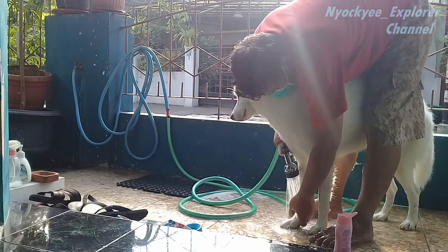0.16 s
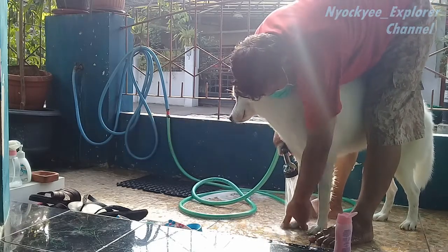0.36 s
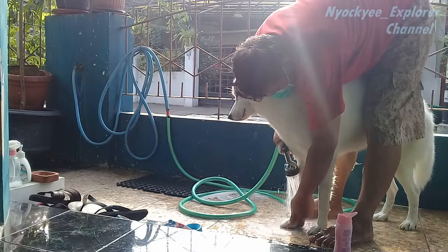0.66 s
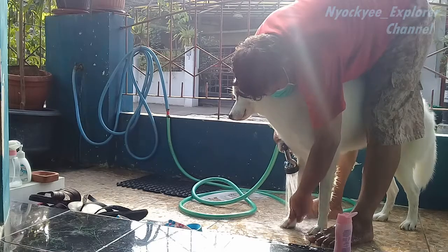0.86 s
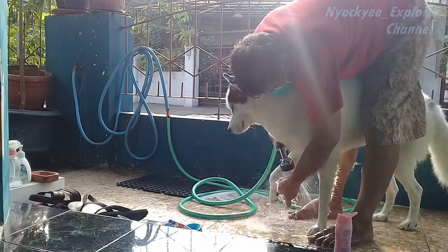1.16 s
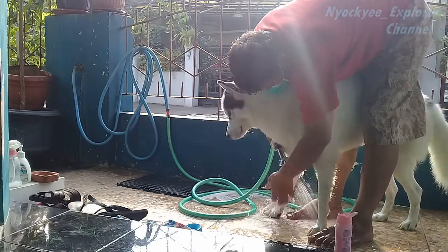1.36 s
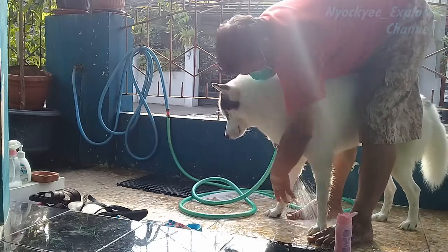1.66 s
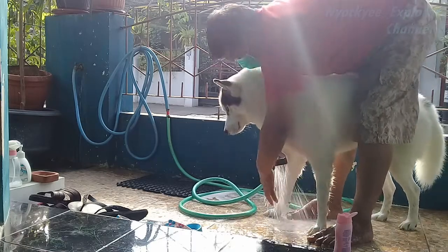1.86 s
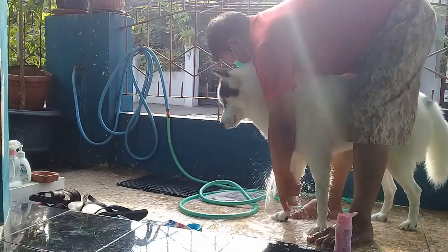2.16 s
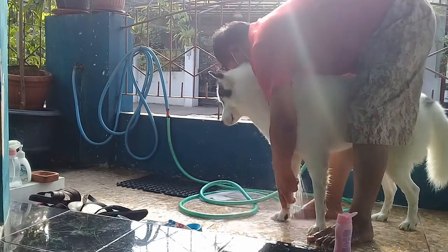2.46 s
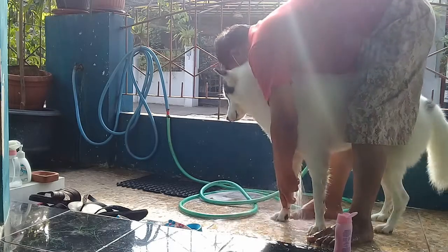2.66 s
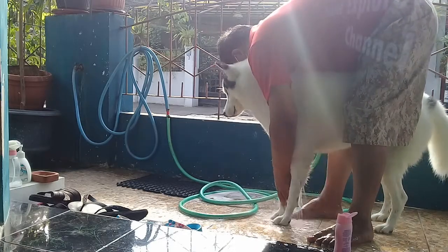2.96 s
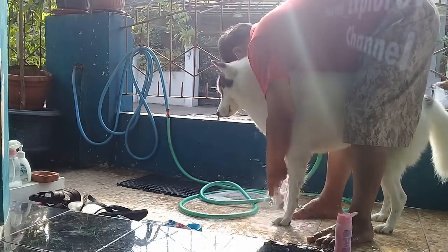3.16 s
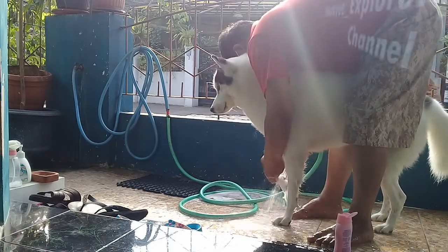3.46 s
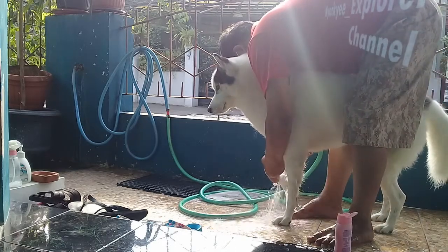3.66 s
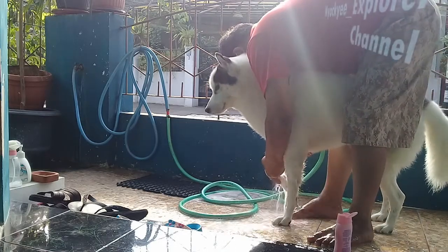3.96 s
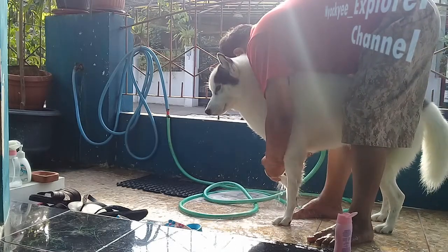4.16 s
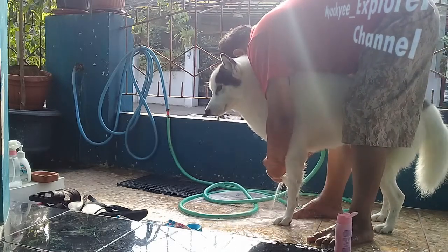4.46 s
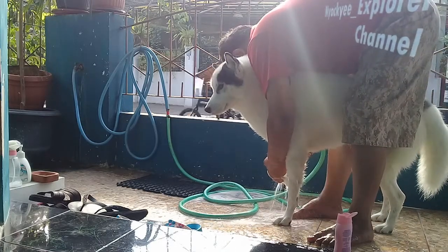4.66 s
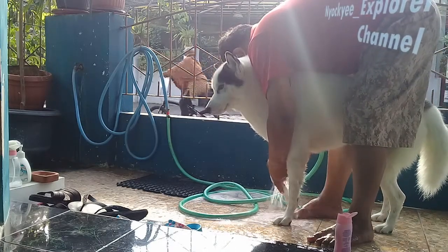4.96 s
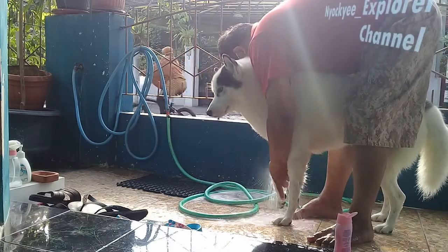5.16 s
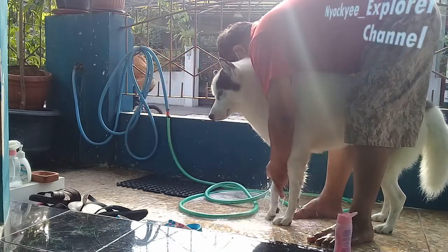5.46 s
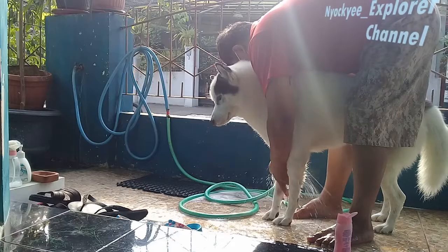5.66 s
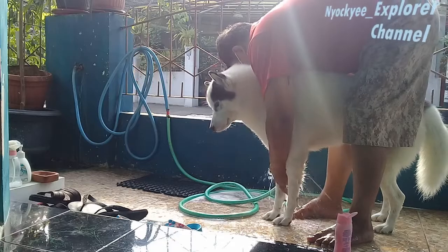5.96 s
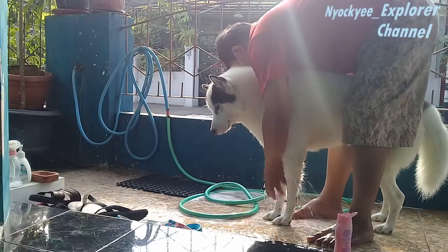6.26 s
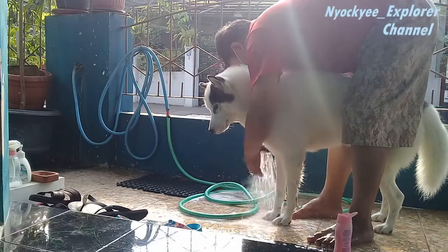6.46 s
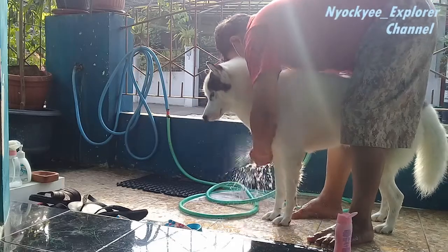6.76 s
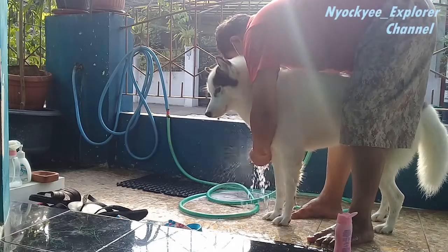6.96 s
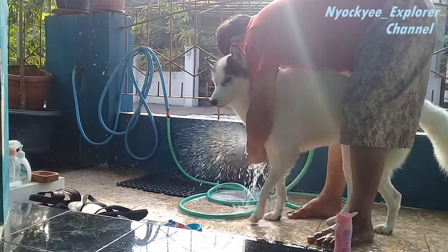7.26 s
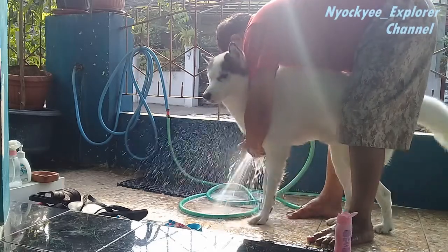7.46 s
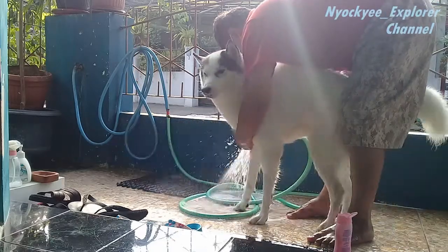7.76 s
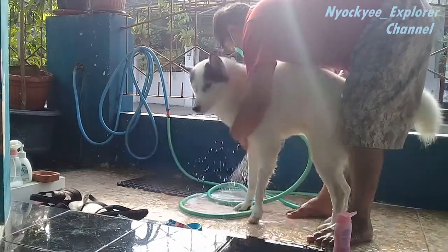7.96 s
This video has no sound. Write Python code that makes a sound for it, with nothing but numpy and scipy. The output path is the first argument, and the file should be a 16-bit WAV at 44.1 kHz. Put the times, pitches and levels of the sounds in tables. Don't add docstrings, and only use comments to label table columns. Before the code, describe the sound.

A hose nozzle sprays a dog's legs close to the microphone on a half-open tiled terrace. Continuous bright hiss and fine patter surge and ease as a hand and legs cross the stream, with bubbling puddle gurgles, short gushes off fur and scattered fat drops. Near the end the spray thins and flung drops snap sharply on the tiles. A faint motor hum and traffic rumble sit far behind.

```python
import sys
import numpy as np
from scipy import signal
from scipy.fft import rfft, irfft
from scipy.io import wavfile

SR = 44100
rng = np.random.default_rng(int(sys.argv[2]) if len(sys.argv) > 2 else 0)


def ratio_of_db(decibels):
    return 10 ** (np.asarray(decibels, float) / 20)


def transcribe(u):
    v = np.clip(np.atleast_2d(u).T, -1, 1)
    q = np.round(v * 32767).astype(np.int16)
    wavfile.write(sys.argv[1], SR, q)


N = 357651

# pitch_hz, density_db (dB per Hz)
STREET_SPECTRUM = [(18, -45), (28, -25), (40, -8.5), (49, -19), (65, -2.5), (93, 1), (130, -1.5), (200, -6),
                   (250, -16.5), (300, -5.5), (360, -13), (450, -13.5), (600, -22.5), (1500, -52)]
# time_s, level_db
STREET_LEVEL = [
    (0.0, -56.5),
    (0.27, -53),
    (3.9, -54),
    (4.3, -52.5),
    (4.7, -55),
    (5.7, -54.5),
    (6.3, -55),
    (8.11, -54.5),
]
# start_s, length_s, pitch_hz, level_db (rms)
ENGINE_DRONES = [(.1, 0.93, 99, -55.5), (.38, 0.19, 338, -61), (.94, 0.16, 272, -57.5),
                 (1.85, 0.45, 101.5, -61), (2.148, 0.13, 295, -60.5), (2.4, 0.75, 101, -55.5),
                 (3.128, .15, 274, -63.5), (3.458, 0.21, 337.5, -56.5), (3.95, 0.32, 101.2, -55.5),
                 (4.45, 0.19, 101.5, -53), (5.2, .35, 97.5, -58.5), (6.3, 0.63, 104, -58),
                 (7.093, 0.83, 110, -54.5)]
# pitch_hz, level_db (rms), wobble_db
PUMP_TONES = [
    (386.6, -54.6, 0.6),
]
# pitch_hz, density_db (dB per Hz)
JET_SPECTRUM = [(2500, -5.5), (5000, -4), (6800, -4), (8000, -0.5), (9200, -5), (9800, 1), (12000, -1.5),
                (14000, -2), (15500, -4.5), (17500, -44)]
# pitch_hz, level_db
CRACKLE_SPECTRUM = [(3500, -14), (6000, -27), (10000, 3), (14500, -11)]
# pitch_hz, level_db
PATTER_SPECTRUM = [(1700, -26), (2400, -4), (3200, 0.5), (4500, 1), (6000, 7.5), (8000, -6.5)]
# pitch_hz, level_db
SPLASH_SPECTRUM = [(1080, 8.5), (1400, 11.5), (1800, 3), (2200, 14), (2800, 17.5)]
# pitch_hz, level_db
GURGLE_SPECTRUM = [(600, -7.5), (750, -12.5), (900, -17), (1050, 2.5)]

# time_s, force_db, bare_tile_share_db, puddle_share_db, puddle_bubble_hz
STREAM_PATH = [(0.0, -50, -0.5, -2.5, 1280), (0.2, -52, -1.5, 0, 1464), (0.6, -52.5, 2.5, -0.5, 1410),
               (0.78, -51.5, -1.5, -11.5, 1630), (1.2, -49.5, -6, -8, 1850), (1.63, -53, 0, -5.5, 1910),
               (1.7, -44.5, -7.5, -18, 1850), (2.08, -49.5, -5, -8, 1850), (2.44, -47.5, -5, -8, 1550),
               (2.62, -49.5, 0, -3, 2030), (3.27, -50.5, -1.5, -10.5, 1870), (3.36, -45.5, -4, -1, 1910),
               (4.0, -46, -0.5, -1, 1780), (4.15, -48, 1.5, -2.5, 2080), (5.2, -45.5, -1.5, -6, 1770),
               (5.38, -55.5, -4, 2, 1610), (6.38, -48.5, 1, -7, 2000), (6.56, -48, 0, -7, 2170)]
# peak_s, length_s, hiss_change_db, patter_change_db
LIMB_SWEEPS = [(0.29, 0.19, 3.5, 5), (0.46, 0.4, -2.5, -5.5), (1.02, 0.08, 1.5, 6.5), (1.22, 0.095, 2.5, 4),
               (1.3, 0.21, 1.7, 5), (1.44, 0.076, 2.5, 3), (1.53, 0.15, 0, 1.5), (1.72, 0.07, -1.5, 3.5),
               (1.92, 0.23, 5.5, 0.5), (2.21, 0.1, -7.5, 1.5), (2.27, 0.27, 3.5, -0.5),
               (2.64, 0.16, 0.5, 1), (3.09, 0.16, 2.5, 3), (4.54, 0.06, -2, -1), (3.42, 0.15, -0.5, 4.5),
               (5.09, 0.2, -1, 2.5), (5.42, 0.084, 5, -5), (5.94, 0.1, 0.5, 3), (6.01, 0.087, -2.5, 3),
               (6.3, 0.11, 1, 1), (6.38, 0.16, -5, -7), (6.44, 0.63, 2, 1.5), (6.76, 0.38, -6, -15),
               (7.11, 0.23, 3, 2.5), (7.28, 0.51, -6, -7.5), (7.39, 0.065, -2, 14), (7.55, 0.3, 4, -4.5),
               (7.79, 0.15, 4.5, 4), (8.085, 0.14, -11, -12), (2.92, 0.086, 1.5, 1), (6.9, 0.24, -3, -1),
               (7.16, 0.06, -4, 0), (7.47, 0.14, -3.5, 0), (1.48, 0.05, 1, 2), (6.62, 0.14, -0.5, 1)]
# peak_s, length_s, splash_change_db, gurgle_change_db
PUDDLE_PLUNGES = [(0.3, 0.39, 9, 3), (0.38, 0.15, 2.5, 2), (1.02, 0.17, 7, 15), (0.8, 0.68, 7, 18),
                  (1.24, 0.19, -4, -8), (1.33, 0.066, 5, 8), (1.74, 0.073, 6, 21), (1.96, 0.12, 0, 12),
                  (2.24, 0.096, 1, 8), (3.09, 0.076, 4, 12), (3.18, 0.27, 9, 7), (3.5, 0.43, 0, 5),
                  (4.13, 0.39, -4.5, 0), (4.34, 0.12, -0.5, 1), (4.54, 0.059, 3, -5), (4.99, 0.29, 1.5, 6),
                  (5.1, 0.13, -6, -11), (5.35, 0.1, 1, 6), (5.8, 0.94, 1, 10), (6.05, 0.19, -3, -7),
                  (6.19, 0.13, 0, 1), (6.35, 0.055, 2, 8), (6.8, 0.33, -2.5, 0), (7.12, 0.27, 8, 3),
                  (7.405, 0.13, 8, 0), (7.54, 0.3, 6, 6), (7.79, 0.13, -17, 2), (7.87, 0.16, 7, 11),
                  (8.0, 0.2, -12, 8), (8.09, 0.089, -18.5, -1), (4.82, 0.18, 1, -7), (5.85, 0.11, -4, -4),
                  (6.62, 0.23, 1, 4), (7.27, 0.2, 0, -3)]
# start_s, end_s, softened_below_hz, loss_db
PUDDLE_MISSES = [
    (1.17, 2.333, 1230, -2),
    (6.42, 7.372, 1390, -5.5),
    (7.45, 8.11, 1240, -5),
]

# start_s, length_s, pitch_hz, level_db (rms)
FUR_GUSHES = [(.27, 0.13, 1490, -52), (1.22, .06, 2460, -59), (1.265, .04, 4000, -54),
              (1.39, 0.027, 3500, -54), (1.43, .03, 3400, -53), (1.465, .04, 2300, -56.5),
              (1.545, .05, 2620, -60), (1.63, .04, 4200, -55), (1.71, 0.037, 4300, -59),
              (1.77, .02, 5400, -57), (1.79, 0.027, 3200, -57), (1.85, .04, 5400, -53),
              (2.03, .02, 5700, -54), (2.112, 0.057, 2400, -55), (2.23, 0.064, 2980, -53),
              (2.37, 0.046, 5700, -52), (2.62, .08, 2140, -58), (2.79, 0.048, 1350, -59),
              (3.15, .06, 2550, -56), (3.36, .03, 4830, -51), (3.4, 0.12, 2850, -52),
              (3.52, 0.096, 1640, -51.5), (3.59, 0.081, 2060, -51), (3.57, .09, 4200, -58),
              (3.91, .08, 1270, -60), (4.96, 0.055, 1700, -52), (5.03, .06, 4630, -54),
              (5.1, 0.065, 4600, -59), (5.08, 0.064, 2800, -51), (5.18, .04, 3500, -51),
              (5.68, 0.11, 1620, -58), (6.322, 0.041, 2040, -47), (6.44, .06, 3400, -56),
              (6.59, .05, 5200, -59), (7.09, .02, 2900, -60), (7.09, 0.061, 1690, -55),
              (7.12, .045, 3400, -48), (7.39, .02, 2200, -60), (7.6, .025, 2700, -53),
              (7.43, .03, 3800, -57), (7.76, 0.13, 3600, -51), (7.81, 0.068, 2270, -58),
              (7.83, 0.037, 4200, -54), (1.32, .01, 12000, -52), (1.426, .012, 12000, -48),
              (1.426, .012, 9500, -54), (2.9, .05, 4400, -55), (.3, 0.092, 2200, -61), (3.3, .1, 2600, -56)]
# start_s, length_s, pitch_hz, level_db (rms)
DROP_SHOWERS = [(.6, 0.57, 840, -65), (3.55, 0.44, 550, -64.5), (3.95, 0.33, 610, -64.5),
                (3.38, 0.21, 1950, -49.5), (1.45, 0.26, 3200, -68), (1.5, 0.89, 1320, -70),
                (2.1, 0.42, 2550, -60), (2.8, 0.37, 1200, -71), (3.3, 0.72, 4270, -54),
                (3.9, .55, 4100, -59), (4.55, 0.44, 2780, -52), (4.85, 0.52, 4800, -55),
                (4.85, 0.18, 1600, -56), (6.5, 0.44, 4800, -62), (5.75, .5, 5600, -57),
                (4.0, .4, 11500, -54), (5.5, .3, 980, -68)]
# start_s, length_s, pitch_hz, level_db (rms)
FUR_TRICKLES = [
    (6.76, 0.19, 1650, -68),
    (5.95, .3, 2200, -63),
    (5.4, .15, 1550, -63),
    (4.95, 0.055, 1680, -56),
]
# time_s, peak_db, ring_hz, crack_db
FAT_DROPS = [(0.5997, -31, 1300, -9), (1.3104, -33, 1620, -6), (1.4274, -28, 3400, 0),
             (1.7883, -25, 3160, 4), (1.84, -27, 4800, 5), (2.42, -33.5, 1320, -6),
             (2.596, -19.5, 3700, -10), (3.1417, -25, 2660, 1), (3.162, -31, 2580, -6),
             (3.2615, -29, 2610, -1), (3.709, -20.5, 3600, -2), (5.0076, -32, 3500, 3),
             (5.1711, -22.5, 3540, -4), (5.2693, -24.5, 3600, -2), (5.5893, -32, 2440, -6),
             (5.9289, -26, 2560, -2), (6.0701, -27, 4300, 8), (6.1594, -26, 3670, 9),
             (6.319, -29, 2120, -9),
             (6.4118, -31, 3440, -1), (6.587, -26, 5500, 1.5), (6.794, -26.5, 4230, 0),
               (6.8259, -23.5, 3790, -8), (7.026, -30, 3340, 8), (7.078, -21, 3050, 0),
               (7.111, -21, 3400, -2), (7.194, -28, 6940, 11), (7.294, -35, 2370, -1),
               (7.3178, -26, 3770, 3), (7.3547, -40, 4200, 12), (7.3785, -28, 2830, 3),
               (7.5383, -26, 3970, 7), (7.591, -23.5, 2750, -4), (7.6322, -23, 4100, 3),
               (7.649, -29, 4090, 6.5), (7.665, -26, 5780, 1.5), (7.745, -26, 3780, 0.2),
               (7.889, -24, 3600, 1), (8.098, -22.5, 2870, 1)]
# time_s, peak_db, ring_hz, crack_db
BEAD_TICKS = [(1.3224, -45, 5100, -1.5), (1.3794, -34, 5180, -1.5), (1.5494, -41, 2560, -5),
              (1.6771, -37, 8980, -3), (2.04, -46, 4120, -1.5), (2.24, -44, 2640, -10),
              (2.9187, -39, 4340, -7), (5.4174, -45, 8330, -6), (5.4594, -42, 5330, -6),
              (5.5394, -41, 5950, -7), (7.0724, -34, 3080, 1), (7.2294, -41, 4500, 0),
              (7.568, -38, 4500, 0), (7.6694, -35, 7800, 9), (7.9894, -34, 9960, -1.5),
              (8.0094, -35, 10700, 7), (8.096, -30.5, 3980, 4)]
# time_s, peak_db, ring_hz, crack_db
TINY_PRICKS = [(1.3231, -30, 5030, 0), (1.3674, -29, 5190, 0), (1.4278, -34, 13400, 0),
               (1.6772, -32, 9450, 2), (1.771, -35, 5230, 0), (1.8139, -32, 9730, -3),
               (2.2395, -37, 8450, 0), (3.0636, -25, 10100, 0), (5.4182, -34, 11100, -3),
               (5.5405, -42, 6000, 2), (5.8298, -43, 5140, 0), (5.9096, -35, 5600, 0),
               (6.414, -34, 5200, 0), (6.9787, -47, 5000, -2), (7.0765, -35, 6180, 0),
               (7.1159, -29, 5470, 0), (7.1927, -25.5, 6940, 0), (7.3109, -39, 5160, 0),
               (7.3588, -36, 5050, 0), (7.3803, -32, 5280, -4), (7.6681, -28, 5780, 0),
               (7.9889, -30, 9960, 0), (8.0094, -26, 10700, 0)]
# time_s, peak_db, ring_hz, crack_db
DRY_SNAPS = [(0.303, -42, 2600, -9), (0.39, -42, 2200, -9), (1.308, -40, 2250, -6), (5.009, -33, 3600, -3),
             (5.173, -34, 2900, -3), (5.175, -36, 4500, -3), (5.272, -41, 3100, -6), (6.796, -40, 5000, -3),
             (7.032, -38, 4400, -3), (7.0783, -25, 3200, 0), (7.083, -31, 3300, 0), (7.095, -34, 3000, -3),
             (7.1115, -25, 3200, -1), (7.116, -30, 3320, -3), (7.133, -37, 3500, 0), (7.191, -39, 1800, -6),
             (7.227, -37, 4600, 2), (7.294, -41, 2700, 6), (7.3548, -33.5, 4200, 7), (7.377, -40, 1700, 3),
             (7.380, -28, 3000, 0), (7.394, -33, 3300, -3), (7.399, -35, 2600, -1), (7.43, -37, 4300, 2),
             (7.538, -35, 3500, 3), (7.845, -39, 1900, 0), (8.097, -34, 5000, 0), (8.103, -38, 2300, 0)]
# time_s, peak_db, centre_hz, crack_db
WATER_SHEETS = [
    (5.9287, -23.5, 3600, 5),
    (6.4123, -20, 4200, -14),
    (7.3786, -17, 3600, -11),
]

# pitch_hz, width_hz, lift_db
ECHO_RIDGES = [(820, 80, 3), (1030, 90, -4), (1123, 50, 3.5), (1290, 70, 3), (1550, 120, 4), (1800, 150, 3),
               (2400, 250, 4), (3020, 200, 2.5), (3400, 200, 2.5), (4300, 350, 3)]
# time_s, bands (count)
TREBLE_GRAIN = [(0.015, 1), (0.108, 1), (0.781, 2), (0.804, 2), (2.128, 2), (2.848, 1), (3.126, 3),
                (3.498, 3), (3.684, 2), (3.8, 1), (3.939, 1), (4.264, 1), (4.287, 1), (4.311, 1),
                (4.543, 2), (4.612, 1), (4.821, 1), (5.402, 2), (6.052, 1), (6.215, 3), (6.702, 2),
                (7.167, 1), (7.492, 1)]
# start_s, end_s
DROPOUT = (6.9574, 6.9786)

PUDDLE_MEAN_DB = -52


def rms_one(x):
    return x / np.sqrt(np.mean(x ** 2) + 1e-20)


def at_hz(points, hz):
    pitch_hz, level_db = np.array(points)[:, 0], np.array(points)[:, 1]
    return np.interp(np.log(hz), np.log(pitch_hz), level_db)


def drift(rate, at=None):
    r = np.exp(-80 * np.pi * rate / SR)
    sparse = rng.standard_normal(N // 40 + 2002)
    slow = signal.lfilter([1], [1, -2 * r, r * r], sparse)[2000:]
    samples = np.arange(N) if at is None else at
    return np.interp(samples / 40, np.arange(len(slow)), rms_one(slow))


def ring(clicks, hz, t60):
    r, w = ratio_of_db(-60 / (t60 * SR)), 2 * np.pi * hz / SR
    return signal.lfilter([0, np.sin(w)], [1, -2 * r * np.cos(w), r * r], clicks + 1e-18)


def band(x, low, high):
    sos = signal.butter(2, [low, min(high, .45 * SR)], "band", fs=SR, output="sos")
    return signal.sosfilt(sos, x)


def in_time(rows):
    s, *columns = np.transpose(rows)
    return [np.interp(np.arange(N) / SR, s, c) for c in columns]


def crossings(events):
    out, t = np.zeros((2, N)), np.arange(N) / SR
    quick_share = 0.3
    for s, length, *change_db in events:
        before = quick_share if sum(change_db) > 0 else 1 - quick_share
        start, end = s - before * length, s + (1 - before) * length
        span = slice(max(round(start * SR), 0), round(end * SR))
        hump = np.interp(t[span], [start, s, end], [0, 1, 0])
        out[:, span] += np.outer(change_db, hump)
    return out


def banded_noise(spectrum, patchy_db, flicker_rate, count):
    out, together, white = 0, drift(flicker_rate), rng.standard_normal((2, N))
    edges = 20 * 2 ** np.arange(0, 10, 1 / count)
    for k, (low, high) in enumerate(zip(edges, edges[1:])):
        hz = np.sqrt(low * high)
        if spectrum[0][0] <= hz <= spectrum[-1][0]:
            flicker_db = patchy_db * (0.57 * together + drift(flicker_rate))
            level = ratio_of_db(at_hz(spectrum, hz) + flicker_db) * np.sqrt(hz)
            out = out + level * rms_one(band(white[k % 2], low, high))
    return rms_one(out)


def street():
    return ratio_of_db(in_time(STREET_LEVEL)[0]) * banded_noise(STREET_SPECTRUM, patchy_db=0.5, flicker_rate=1.9, count=3)


def pump():
    t, out = np.arange(N) / SR, np.zeros(N)
    for hz, db, wobble_db in PUMP_TONES:
        level = np.sqrt(2) * ratio_of_db(db + wobble_db * drift(2.5))
        out += level * np.sin(2 * np.pi * hz * t + 0.16 * drift(1.1))
    return out


def drops(spectrum, per_s, cycles, uneven_db, clump_db, patch_db, centre_hz=None, focus_db=0, count=20):
    size_db = uneven_db * np.minimum(rng.exponential(1, N), 3)
    signs = rng.choice([-1, 1], N)
    landed, clumps_db = rng.random(N) < per_s / SR, clump_db * drift(38)
    pitches = np.geomspace(spectrum[0][0], spectrum[-1][0], count)
    dealt = rng.integers(0, count, N)
    out = 0
    for k, hz in enumerate(pitches):
        at, clicks = np.flatnonzero(landed & (dealt == k)), np.zeros(N)
        flurry_db = patch_db * drift(5.0, at)
        level_db = at_hz(spectrum, hz) + clumps_db[at] + flurry_db
        if centre_hz is not None:
            level_db -= focus_db * np.log2(hz / centre_hz[at]) ** 2
        clicks[at] = signs[at] * ratio_of_db(level_db + size_db[at])
        out = out + np.sqrt(hz) * ring(clicks, hz, np.clip(cycles, 1, 14) / hz)
    no_lows = signal.butter(6, .9 * pitches[0], "high", fs=SR, output="sos")
    return rms_one(signal.sosfilt(no_lows, out))


def jet(jet_db):
    beads = drops(CRACKLE_SPECTRUM, 980, 4.1, uneven_db=7.0, clump_db=4.0, patch_db=-2.0, count=10)
    hiss = banded_noise(JET_SPECTRUM, patchy_db=1.0, flicker_rate=15, count=6)
    return ratio_of_db(jet_db) * (hiss + ratio_of_db(-16.0) * beads)


def tile_patter(force_db, tile_db, jet_db):
    finer_oct = 0.04 * (force_db - force_db.mean())
    bigger_oct = -0.06 * (tile_db - jet_db)
    tile_hz = 3600 * 2 ** (finer_oct + bigger_oct + 0.052 * drift(1.0))
    patter = drops(PATTER_SPECTRUM, 12000, 30.0, uneven_db=0.5, clump_db=1.0, patch_db=1.5,
                   centre_hz=tile_hz, focus_db=10.0, count=20)
    return ratio_of_db(tile_db) * patter


def thin_lows(water, share, cut_hz):
    low = signal.sosfiltfilt(signal.butter(4, cut_hz, fs=SR, output="sos"), water)
    return water - share * low


def puddle_splash(splash_db, puddle_hz):
    splash = drops(SPLASH_SPECTRUM, 8000, 5.8, uneven_db=1.5, clump_db=0.0, patch_db=3.0,
                   centre_hz=puddle_hz, focus_db=18.5, count=14)
    shallow = np.clip((puddle_hz - 1370) / (1850 - 1370), 0, 1)
    splash = thin_lows(splash, shallow, 1050)
    raised = np.clip((puddle_hz - 2040) / (2200 - 2040), 0, 0.6)
    return ratio_of_db(splash_db) * thin_lows(splash, raised, 2900)


def puddle_gurgle(puddle_db, deep_db):
    plunge_db = puddle_db - PUDDLE_MEAN_DB
    gurgle_hz = 1036 * 2 ** (0.04 * plunge_db)
    gurgle = drops(GURGLE_SPECTRUM, 4000, 7.0, uneven_db=0.0, clump_db=0.5, patch_db=3.0,
                   centre_hz=gurgle_hz, focus_db=19.0, count=10)
    return ratio_of_db(-65 + 1.28 * plunge_db + deep_db) * gurgle


def terrace(x):
    t60_s, level_db = 0.32, -10.5
    t = np.arange(round(.4 * SR)) / SR
    echoes = rng.standard_normal(len(t)) * ratio_of_db(-60 * t / t60_s) * (t > .006)
    echoes = band(echoes, 270, 16400)
    return ratio_of_db(level_db) * signal.fftconvolve(x, echoes / np.sqrt(np.sum(echoes ** 2)))[:N]


def ridges(x):
    for hz, width_hz, lift_db in ECHO_RIDGES:
        r = np.exp(-np.pi * width_hz / SR)
        w = 2 * np.pi * hz / SR
        peak = signal.lfilter((1 - r * r) / 2 * np.array([1, 0, -1]), [1, -2 * r * np.cos(w), r * r], x)
        x = x + (ratio_of_db(lift_db) - 1) * peak
    return x


def drones():
    out, waver = np.zeros(N), 0.86 * drift(4.2)
    for s, length, hz, db in ENGINE_DRONES:
        span = slice(round(s * SR), round((s + length) * SR))
        t = np.arange(N)[span] / SR
        tone = np.sin(2 * np.pi * hz * t + waver[span])
        out[span] += np.sqrt(2) * ratio_of_db(db) * np.sqrt(np.hanning(len(t))) * tone
    return out


def gushes(events, octaves, ragged_db, rise_share):
    out, t = np.zeros(N + SR), np.arange(round(.7 * SR)) / SR
    beads, lumps = rng.standard_normal((len(events), len(t))), rng.standard_normal((len(events), 72))
    spread = 2 ** (np.clip(octaves, .08, 1.2) / 2)
    rise = np.clip(rise_share, .02, .6)
    for (s, length, hz, db), noise, lump in zip(events, beads, lumps):
        shape = np.interp(t / length, [0, rise, .7, 1.4], [0.32, 0.97, 0.77, 0])
        ragged = noise * ratio_of_db(ragged_db * np.interp(t * 100, np.arange(len(lump)), lump))
        at = round(s * SR)
        out[at:at + len(t)] += ratio_of_db(db) * shape * rms_one(band(ragged, hz / spread, hz * spread))
    return out[:N]


def runoff():
    return (gushes(FUR_GUSHES, octaves=0.25, ragged_db=4.5, rise_share=0.12)
            + gushes(DROP_SHOWERS, octaves=0.47, ragged_db=3.5, rise_share=0.39)
            + gushes(FUR_TRICKLES, octaves=0.1, ragged_db=4.0, rise_share=0.27))


def slaps(events, lift_db, t60, octaves):
    out, t = np.zeros(N), np.arange(round(.3 * SR)) / SR
    spatter = rng.standard_normal((len(events), len(t))) ** 3
    spread = 2 ** (np.clip(octaves, .08, 1.6) / 2)
    for (s, db, hz, crack_db), noise in zip(events, spatter):
        pocket = band(noise * ratio_of_db(-60 * t / np.clip(t60, .005, .3)), hz / spread, hz * spread)
        crack = band(noise * ratio_of_db(-60 * t / 0.0035), hz / 1.1, hz * 2.0)
        shape = pocket / np.abs(pocket).max() + ratio_of_db(crack_db) * crack / np.abs(crack).max()
        at = round(s * SR)
        out[at:at + len(t)] += ratio_of_db(db + lift_db) * shape[:N - at]
    return out


def dry_snaps():
    return slaps(DRY_SNAPS, lift_db=-3.5, t60=0.032, octaves=0.44)


def tile_hits():
    return (slaps(FAT_DROPS, lift_db=-12.0, t60=0.1, octaves=0.29)
            + slaps(BEAD_TICKS, lift_db=-2.0, t60=0.073, octaves=0.31)
            + slaps(TINY_PRICKS, lift_db=-4.5, t60=0.027, octaves=0.83)
            + slaps(WATER_SHEETS, lift_db=-11.5, t60=0.63, octaves=4.8))


def misses(water):
    out, fade_s = water.copy(), .03
    for start, end, hz, loss_db in PUDDLE_MISSES:
        span = slice(round(start * SR), round(end * SR))
        t = np.arange(N)[span] / SR
        low = signal.sosfiltfilt(signal.butter(8, hz, fs=SR, output="sos"), water[span])
        fade = np.clip(np.minimum(t - start, end - t) / fade_s, 0, 1)
        out[span] -= (1 - ratio_of_db(loss_db)) * fade * low
    return out


def scene():
    force_db, tile_share_db, puddle_share_db, puddle_hz = in_time(STREAM_PATH)
    hiss_db, patter_db = crossings(LIMB_SWEEPS)
    splash_db, deep_db = crossings(PUDDLE_PLUNGES)
    jet_db = force_db + hiss_db
    tile_db = force_db + tile_share_db + patter_db
    puddle_db = force_db + puddle_share_db
    near = tile_patter(force_db, tile_db, jet_db) + puddle_splash(puddle_db + splash_db, puddle_hz)
    near = near + puddle_gurgle(puddle_db, deep_db) + runoff() + tile_hits()
    water = ratio_of_db(-1.5) * ridges(misses(near + terrace(near)))
    mono = water + jet(jet_db) + dry_snaps() + street() + pump() + drones()
    return np.array([mono, mono])


def treble_grain(x):
    half = 1024
    size = 2 * half
    out, hz, window = x.copy(), np.arange(half + 1) * SR / size, np.hanning(size) ** 2
    for (s, bands), noises in zip(TREBLE_GRAIN, rng.standard_normal((len(TREBLE_GRAIN), 3, size))):
        start = max(round(s * SR) - half, 0)
        block = slice(start, start + size)
        for low, noise in zip(rng.uniform(4100, 14200, bands), noises):
            inside = (hz > low) & (hz < low + 1650)
            sound_rms = np.std(irfft(rfft(x[0, block]) * inside))
            grain = rms_one(irfft(rfft(noise) * inside))
            out[:, block] += sound_rms * window * grain * np.array([[1], [-1]])
    return out


def band_limit(x):
    return signal.sosfilt(signal.butter(12, 16730, fs=SR, output="sos"), x)


def record(dry):
    t = np.arange(N) / SR
    start_s, end_s = DROPOUT
    kept = (t < start_s) | (t > end_s)
    top_cut = signal.ellip(14, .1, 75, 15750, fs=SR, output="sos")
    mix = signal.sosfilt(top_cut, treble_grain(dry)) * kept
    return band_limit(mix)


dry = scene()
out = record(dry)
transcribe(out)
```